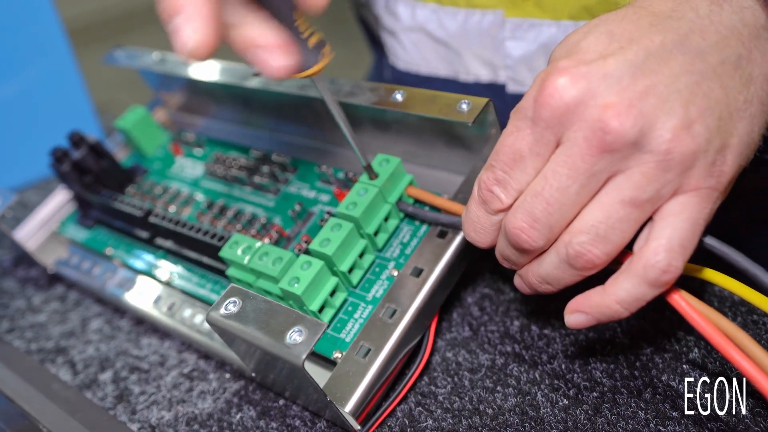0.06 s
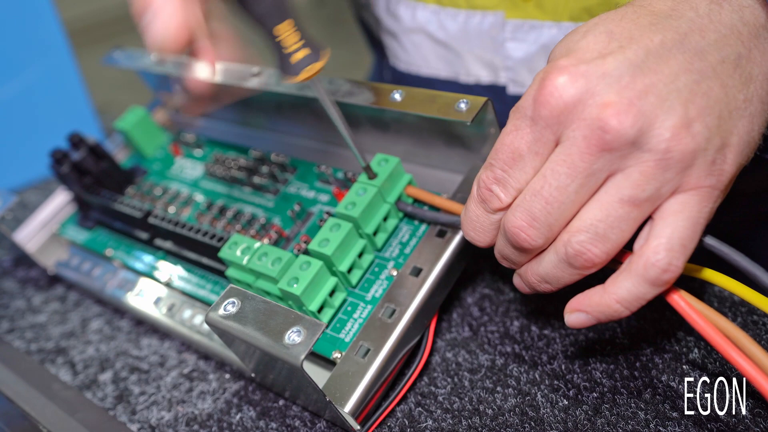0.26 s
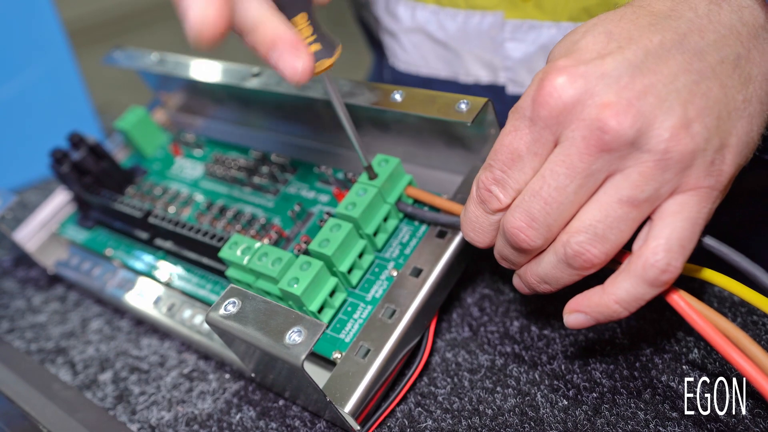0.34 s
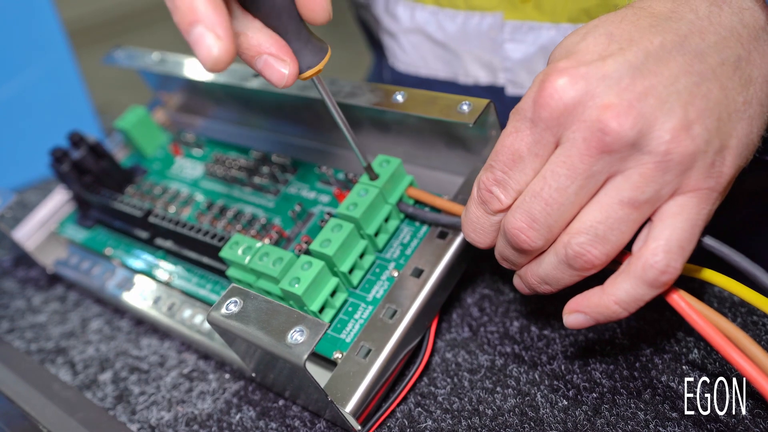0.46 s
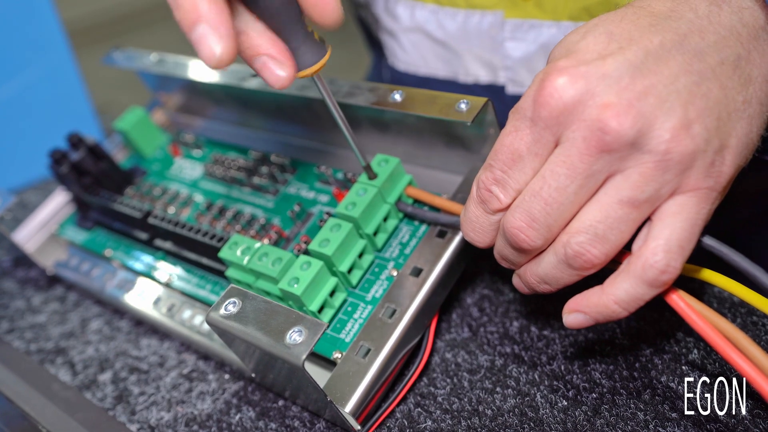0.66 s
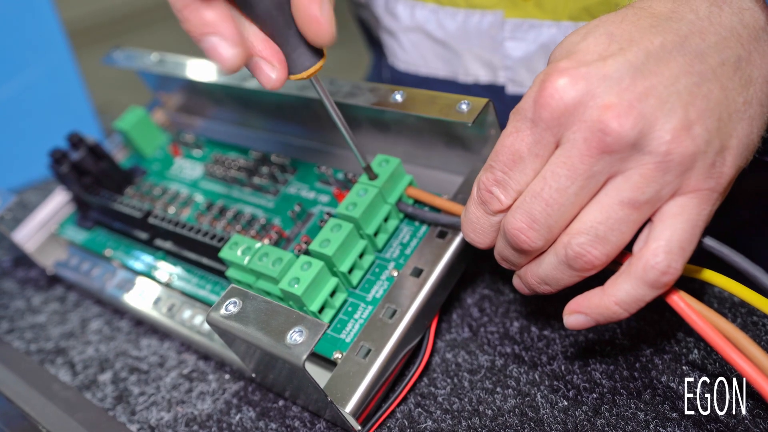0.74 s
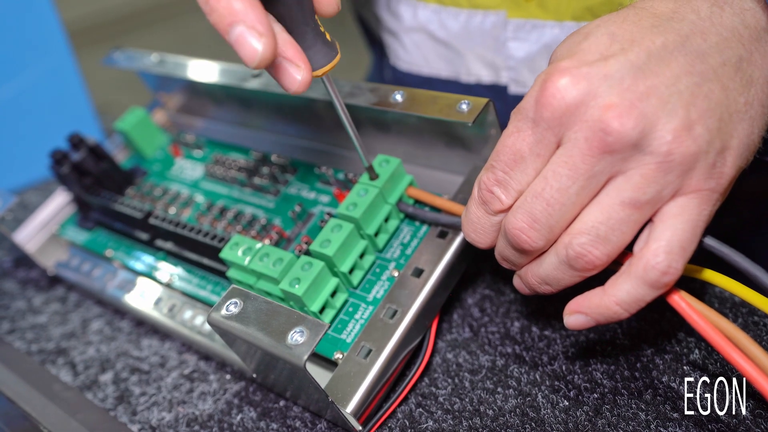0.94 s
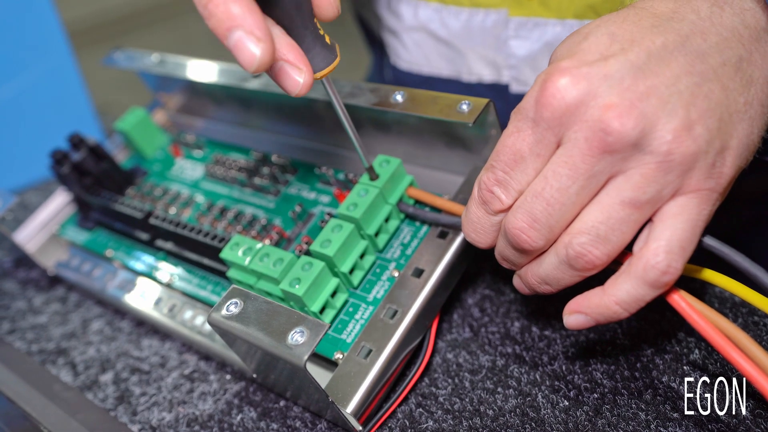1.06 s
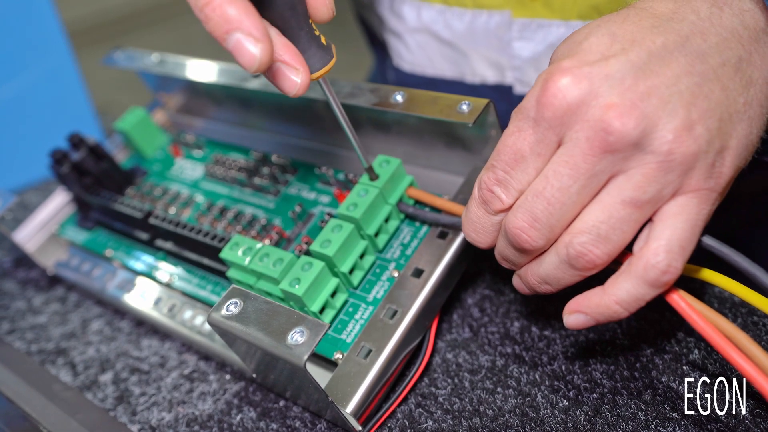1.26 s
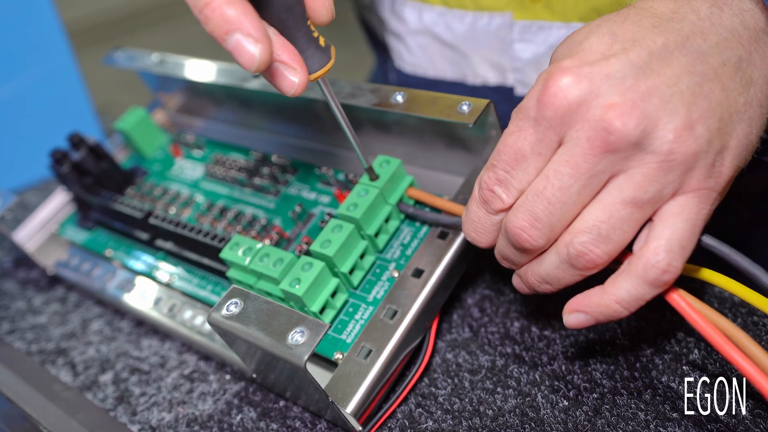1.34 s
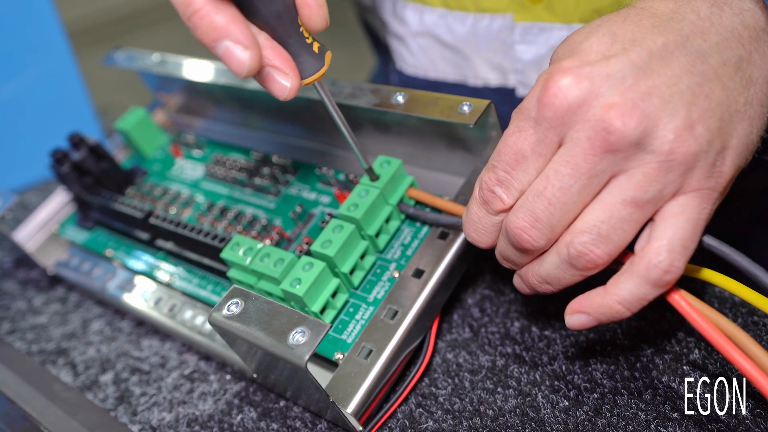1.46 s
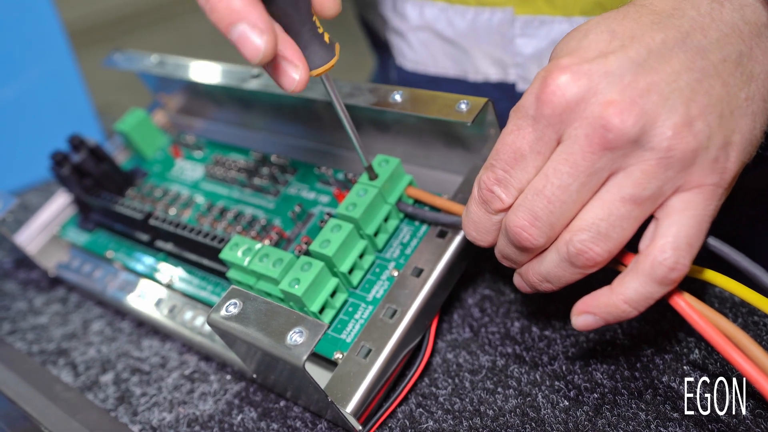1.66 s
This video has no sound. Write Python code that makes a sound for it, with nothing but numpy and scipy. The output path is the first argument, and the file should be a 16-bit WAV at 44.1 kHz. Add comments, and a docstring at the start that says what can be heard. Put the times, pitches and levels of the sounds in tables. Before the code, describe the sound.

A screwdriver blade snaps twice in a screw slot, with lighter ticks, bumps and faint rubbing

```python
"""Impact and friction of a screwdriver

A small screwdriver tightens the screw of a terminal block on a circuit board in a sheet-metal case.
The blade ticks in the slot and twice snaps hard against it: each contact is a noise burst that excites
damped modes of blade, block, board and case. Fingers rub on the handle and the wire, heard as coloured
noise of varying level. A decaying noise response gives the small room; a few sines give its faint hum."""
import sys
import numpy as np
from scipy import signal
from scipy.fft import rfft, irfft, next_fast_len
from scipy.io import wavfile
from scipy.ndimage import map_coordinates

SR = 44100
rng = np.random.default_rng(int(sys.argv[2]) if len(sys.argv) > 2 else 0)


def output_pcm(signal):
    """Save a mono or channel-first signal as 16-bit PCM at the path in sys.argv[1].

    Samples are clipped to [-1, 1] before scaling.
    """
    pcm = np.clip(np.atleast_2d(signal).T, -1, 1) * 32767
    wavfile.write(sys.argv[1], SR, np.round(pcm).astype(np.int16))


N = 74970  # length in samples

# Colours give relative spectral density: each noise is scaled to rms 1 before its level is applied.
# steady room noise: [f/Hz, relative level/dB]
AIR_COLOUR = [(15, -52.5), (25, -1.5), (59, -13.5), (91, 0), (110, -9), (178, -1), (313, -4.5), (445, -11),
              (722, -14.5), (1530, -28), (1950, -27.5), (2170, -29.5), (15500, -39)]
# hum partials: [f/Hz, rms level/dB]
HUM_PARTIALS = [(86.3, -63), (199, -67), (311, -71)]
AIR_LEVEL_DB = -52.5

# rubbing of fingers and screw thread: [t/s, level/dB] and [f/Hz, relative level/dB]
RUB_LEVEL = [(0, -46), (.12, -54), (.16, -46.5), (.3, -52.5), (.5, -54), (.6, -57.5), (.72, -56.5),
             (.85, -48.5), (1.1, -59), (1.35, -61.5), (1.46, -54.5), (1.56, -60.5), (1.7, -59.5)]
RUB_COLOUR = [(40, -2), (150, 12), (400, -5.5), (1000, 1.5), (2500, 0), (4700, -11.5), (8000, -23),
              (15000, -32)]
# sleeve and cable shifting, a dull rustle: [t/s, level/dB] and [f/Hz, relative level/dB]
RUSTLE_LEVEL = [(0, -52.5), (.1, -49.5), (.6, -62), (1.3, -64), (1.5, -49), (1.58, -59.5), (1.7, -52.5)]
RUSTLE_COLOUR = [(30, -19), (110, 6), (260, -3), (450, -8), (650, -10), (1050, -3.5), (1400, -23),
                 (5000, -42.5)]
RUB_ROUGH_DB, RUB_ROUGH_PER_S = 1, 47  # depth of the unevenness, random values per second

# soft bumps of the hands on the case: [t/s, level/dB, f/Hz]
BUMPS = [(0.066, -25.5, 176.4), (0.382, -30.5, 137.7), (1.476, -45, 54)]
BUMP_RISE_CYCLES, BUMP_T60_CYCLES = 1.3, 17

# blade contacts: [t/s, level/dB, brightness/(dB per octave), low knock/dB, case ring/dB,
# board ring/dB, blade ring/dB]
CONTACTS = [(0.0600, -47, 1, -19, -16, -3, -15), (0.0753, -36.5, -1.5, 9, -18, 2, -29),
            (0.14, -47, -5.5, -12.5, -9.5, 10, -17), (0.1473, -30.5, -2, -18, -3, 5.5, -6.5),
            (0.1734, -34.5, -3, 7, 10.5, 5.5, -6), (0.2119, -12.5, -0.5, -3.5, -3, 4.5, 4),
            (0.3797, -38.5, -3.5, 12, 2, 5, 7.5), (0.4173, -47.5, -4, -19, -9, 0, -11),
            (0.456, -32, -2.45, 5, -25, 0.5, -28), (0.4920, -44.5, -5.5, 5, -18.5, 4, -24.5),
            (0.7461, -31, -0.5, -14, -6.5, -26, -35.5), (0.7531, -15, 0.3, -0.5, 2.5, -4, 7),
            (0.8801, -29.5, -2, 4, 0.5, 0.5, -12), (0.8926, -45, -2.5, 2.5, 6, 14.5, -5),
            (1.466, -57, -10, -5, 8, 10, -12), (1.6119, -53, -7, -25, 2, 7.5, 7)]
# first instant of contact: [f/Hz, relative level/dB]
CRACK_COLOUR = [(100, -3.5), (1000, -6), (3000, 3), (6500, -2.5), (8500, -22.5), (15500, -20)]
# dense clatter of all higher and weaker modes: [f/Hz, relative level/dB] and [f/Hz, t60/s]
CLATTER_COLOUR = [(60, -36), (300, -6), (460, -7.5), (700, -0.5), (1100, -3.5), (1500, -0.5), (1850, 4),
                  (2200, -2.5), (2750, 3), (3220, -10.5), (3600, -2.5), (4600, -5.5), (5200, -13),
                  (6900, -14), (7700, -20), (15500, -31)]
CLATTER_T60 = [(200, 0.25), (800, 0.095), (2000, 0.086), (4500, 0.077), (12000, .055)]
# screwdriver shaft, damped by the hand: [f/Hz, level/dB, t60/s]
BLADE_MODES = [(1709.6, -0.5, 0.01), (1921, -8, 0.042)]
# terminal block, heavily damped: [f/Hz, level/dB, t60/s]
BLOCK_MODES = [(1703, -7.5, 0.078), (1966, -4, 0.092), (2337, -7.5, 0.064), (2797, -19, 0.062),
               (3495, 7.5, 0.019), (4560, -5.5, 0.068)]
# circuit board and its small metal parts: [f/Hz, level/dB, t60/s]
BOARD_MODES = [(798.6, -13, 0.086), (989.3, -13.5, 0.1), (1100.5, -9.5, 0.09), (4700, -32.5, 0.24)]
# sheet-metal case, ringing on: [f/Hz, level/dB, t60/s]
CASE_MODES = [(1295.3, 0.5, 0.12), (1390, -12, .08), (2033, -3.5, 0.16), (2005, -34, 0.98),
              (2155, -7.5, 0.13), (2980, -11.5, 0.12), (3240, -25.5, 0.13), (7900, -33.5, 0.15)]
# the whole case knocking on the bench: [f/Hz, level/dB, t60/s]
KNOCK_MODES = [(50.3, -17.5, 0.3), (134.6, -14, 0.57), (195, -3.5, 0.16), (317.3, -2, 0.098)]
CRACK_DB, CRACK_T60_S = -2.5, 0.024
BLADE_DB, BLOCK_DB, CASE_DB, KNOCK_DB = 13, -0.5, -5.5, -10.5
# time constants of the swell as the vibration spreads; the board shares that of the block
BLADE_RISE_S, BLOCK_RISE_S, CASE_RISE_S = 0.0031, 0.0031, 0.012
CLATTER_RISE_S, KNOCK_RISE_S = 0.00049, 0.0047
SCATTER_DB = 2.5  # standard deviation of each mode's level
PIVOT_HZ = 1940  # the brightness slope leaves this frequency unchanged

# reverberation of the room: [f/Hz, t60/s] and [f/Hz, level/dB]
ROOM_T60 = [(120, 0.91), (500, 0.64), (2000, 0.98), (5000, 0.64), (12000, 0.556)]
ROOM_COLOUR = [(60, -12), (160, 8), (450, 3), (1200, 0), (1750, -5.5), (2050, -2), (3000, 0), (3600, -6.5),
               (6000, -2), (14000, -3.5)]
ROOM_DB = -20.5
TOP_HZ = 15900  # upper band limit


def amp(db):
    """Logarithmic level: 20 dB is a factor of ten in amplitude."""
    return 10 ** (np.asarray(db) / 20)


def unit(x):
    """Normalization by mean power: x scaled to rms 1."""
    return x / np.sqrt(np.mean(x ** 2) + 1e-20)


def along(points, hz):
    """Interpolation of (f, value) points on a logarithmic frequency axis."""
    f, value = np.transpose(points)
    return np.interp(np.log(hz + 1), np.log(f + 1), value)


def filtered(x, response):
    """Linear filtering: the spectrum of x times a gain that depends on frequency."""
    size = next_fast_len(len(x) + SR // 4)
    hz = np.fft.rfftfreq(size, 1 / SR)
    return irfft(rfft(x, size) * response(hz), size)[:len(x)]


def noise(colour):
    """Spectral shaping of white noise, scaled to rms 1."""
    white = rng.standard_normal(N)
    return unit(filtered(white, lambda hz: amp(along(colour, hz))))


def decay(t, t60):
    """Exponential damping: a fall of 60 dB in t60 seconds."""
    return np.exp(-np.log(1000) * t / t60)


def dying(x, t60s, size=128):
    """Frequency-dependent damping: each band of x decays at its own rate."""
    hz, t, bands = signal.stft(x, SR, nperseg=size)
    fall_db = -60 * t / along(t60s, hz)[:, None]
    return signal.istft(bands * amp(fall_db), SR, nperseg=size)[1][:len(x)]


def ring(modes, rise_s):
    """Modal superposition: damped sines of scattered level and alternating sign swell together."""
    t = np.arange(N) / SR
    tones = np.zeros(N)
    for k, (hz, db, t60) in enumerate(modes):
        level = amp(db + SCATTER_DB * rng.standard_normal())
        tones += (-1) ** k * level * decay(t, t60) * np.sin(2 * np.pi * hz * t)
    return tones * (1 - np.exp(-t / rise_s))


def background():
    """Stationary sound: coloured noise plus hum partials of random phase."""
    t = np.arange(N) / SR
    hum = np.zeros(N)
    for hz, db in HUM_PARTIALS:
        hum += amp(db) * np.sqrt(2) * np.sin(2 * np.pi * (hz * t + rng.random()))
    return amp(AIR_LEVEL_DB) * noise(AIR_COLOUR) + hum


def rubbing():
    """Friction noise: uneven rubbing of the fingers and the duller rustle of sleeve and cable."""
    t = np.arange(N) / SR
    rough = map_coordinates(rng.standard_normal(N // 100), [t * RUB_ROUGH_PER_S])
    finger_db = np.interp(t, *np.transpose(RUB_LEVEL)) + RUB_ROUGH_DB * rough
    rustle_db = np.interp(t, *np.transpose(RUSTLE_LEVEL))
    return amp(finger_db) * noise(RUB_COLOUR) + amp(rustle_db) * noise(RUSTLE_COLOUR)


def bumps():
    """Single-mode response to a soft impulse: a hand nudges the case, a low swing with no click."""
    out = np.zeros(N)
    for s, db, hz in BUMPS:
        start = round(s * SR)
        swing = ring([(hz, 0, BUMP_T60_CYCLES / hz)], BUMP_RISE_CYCLES / hz)
        out[start:] += amp(db) * swing[:N - start]
    return out


def clicks():
    """Impact excitation: each contact rings blade, block, board and case and knocks the case."""
    out = np.zeros(N)
    t = np.arange(N) / SR
    for s, db, bright_db, knock_db, case_db, board_db, blade_db in CONTACTS:
        crack = amp(CRACK_DB) * noise(CRACK_COLOUR) * decay(t, CRACK_T60_S)
        clatter = dying(noise(CLATTER_COLOUR), CLATTER_T60) * (1 - np.exp(-t / CLATTER_RISE_S))
        blade = amp(BLADE_DB + blade_db) * ring(BLADE_MODES, BLADE_RISE_S)
        block = amp(BLOCK_DB) * ring(BLOCK_MODES, BLOCK_RISE_S)
        board = amp(board_db) * ring(BOARD_MODES, BLOCK_RISE_S)
        case = amp(CASE_DB + case_db) * ring(CASE_MODES, CASE_RISE_S)

        def brightness(hz):
            """Spectral tilt in dB per octave, level below 300 Hz."""
            return amp(bright_db * np.log2(np.maximum(hz, 300) / PIVOT_HZ))

        body = filtered(crack + clatter + blade + block + board + case, brightness)
        knock = amp(KNOCK_DB + knock_db) * ring(KNOCK_MODES, KNOCK_RISE_S)
        start = round(s * SR)
        out[start:] += amp(db) * (body + knock)[:N - start]
    return out


def room(x):
    """Diffuse reverberation: convolution with coloured noise that decays band by band."""
    tail = dying(rng.standard_normal(N), ROOM_T60, size=256)
    tail = tail / np.linalg.norm(tail)  # unit energy
    tail = filtered(tail, lambda hz: amp(along(ROOM_COLOUR, hz)))
    return signal.fftconvolve(x, tail)[:N]


def scene():
    """Superposition: direct impacts, their weak reverberation, friction and background."""
    impacts = clicks() + bumps()
    return (impacts + amp(ROOM_DB) * room(impacts) + rubbing() + background())[None]


def record(dry):
    """Band limitation: nothing is kept at or above the upper limit."""
    return np.array([filtered(x, lambda hz: hz < TOP_HZ) for x in dry])


dry = scene()
out = record(dry)
output_pcm(out)
```